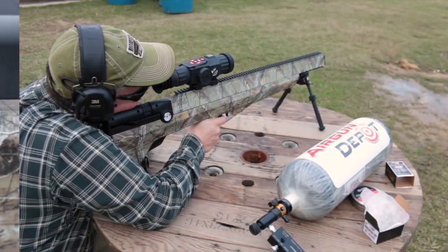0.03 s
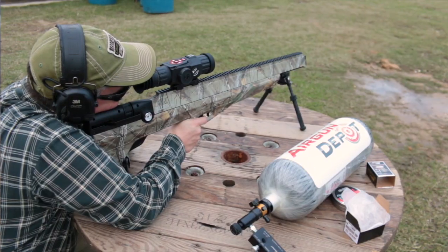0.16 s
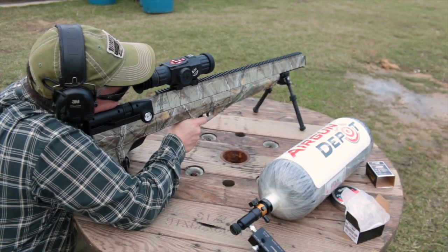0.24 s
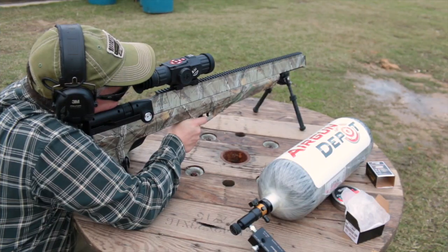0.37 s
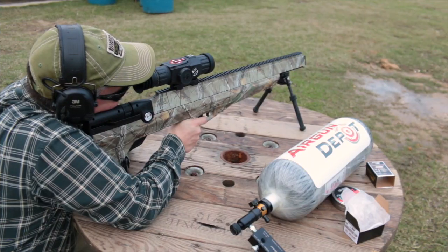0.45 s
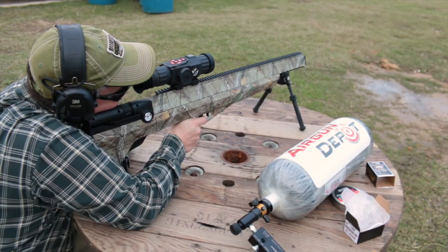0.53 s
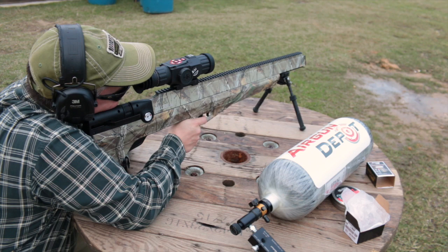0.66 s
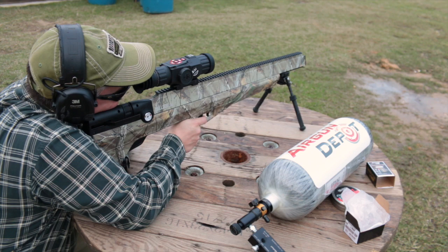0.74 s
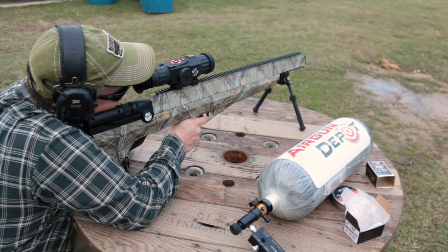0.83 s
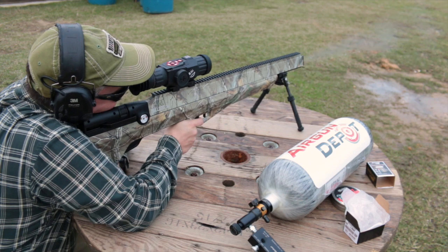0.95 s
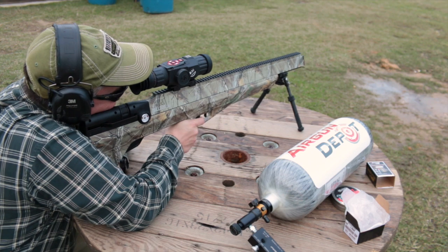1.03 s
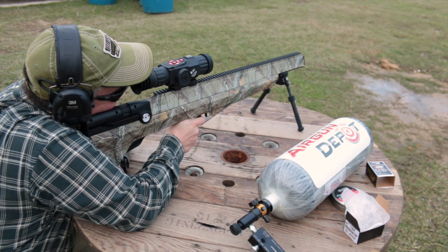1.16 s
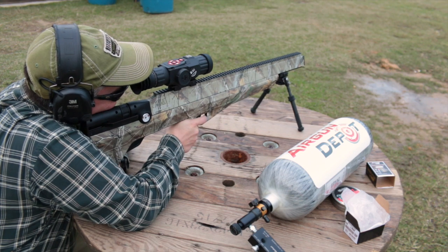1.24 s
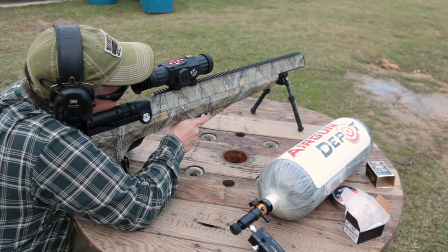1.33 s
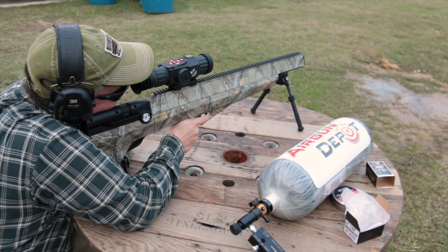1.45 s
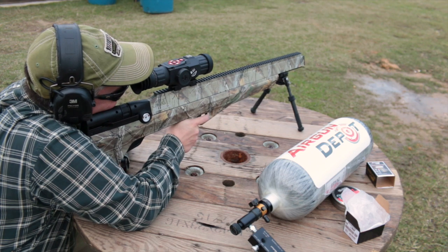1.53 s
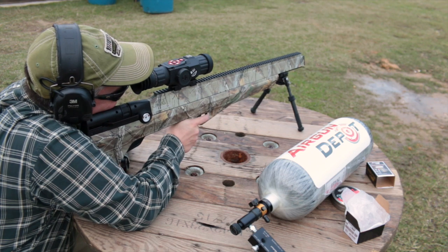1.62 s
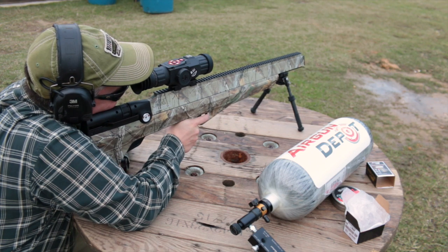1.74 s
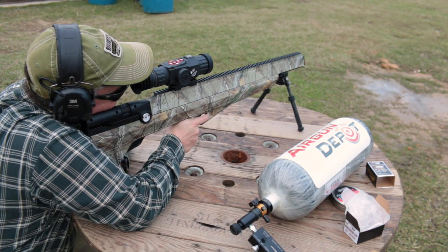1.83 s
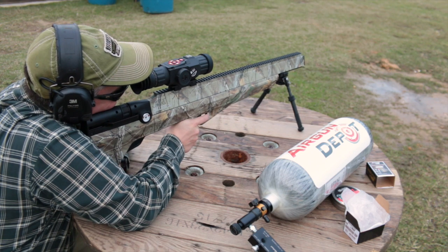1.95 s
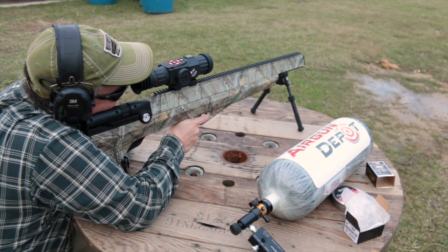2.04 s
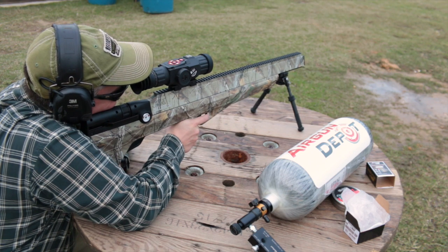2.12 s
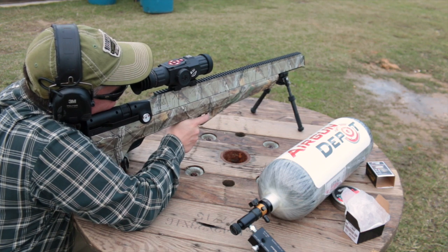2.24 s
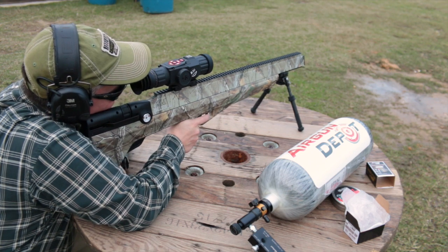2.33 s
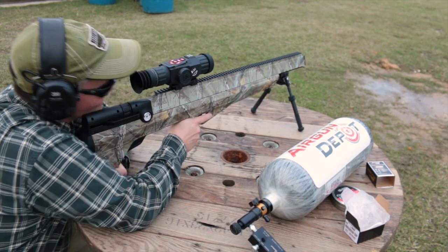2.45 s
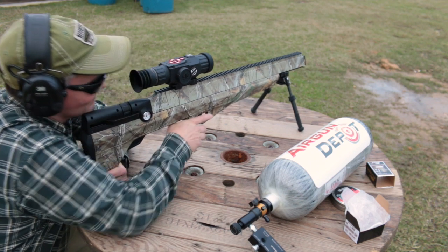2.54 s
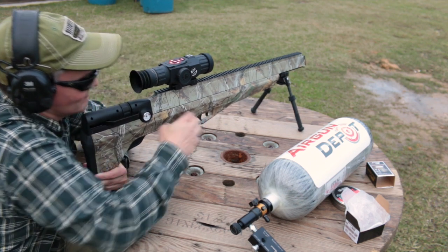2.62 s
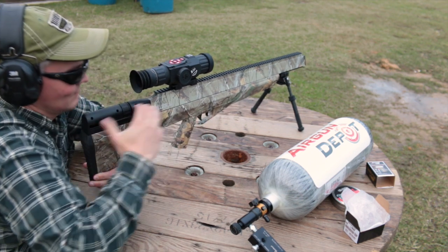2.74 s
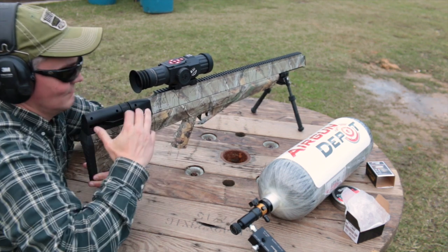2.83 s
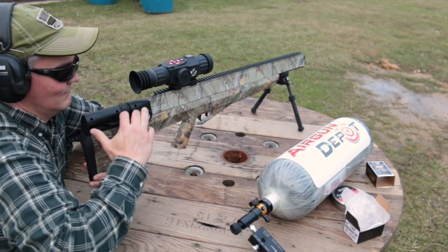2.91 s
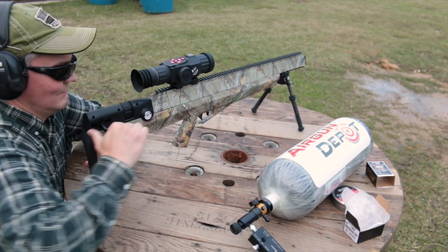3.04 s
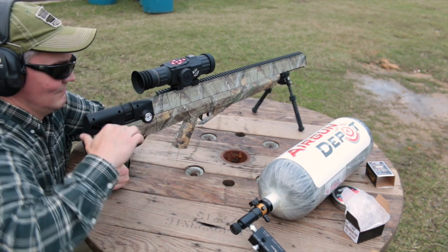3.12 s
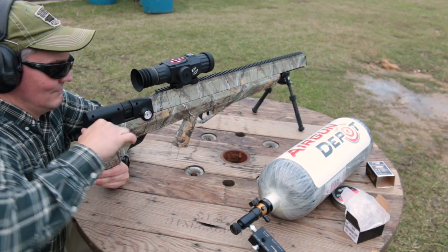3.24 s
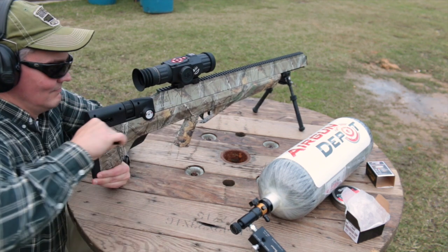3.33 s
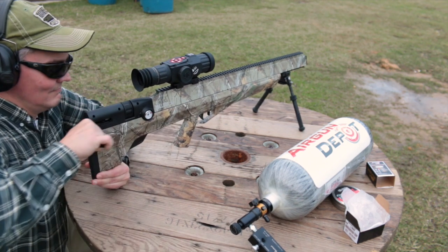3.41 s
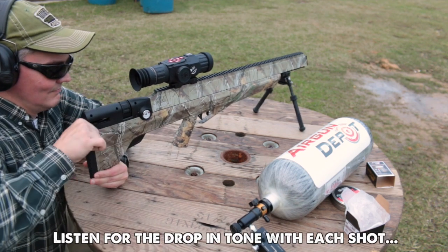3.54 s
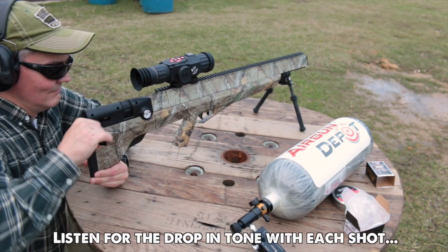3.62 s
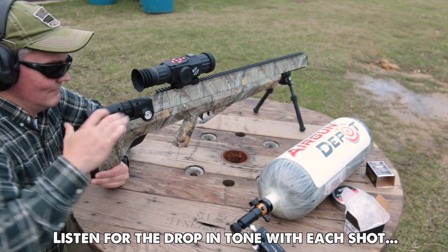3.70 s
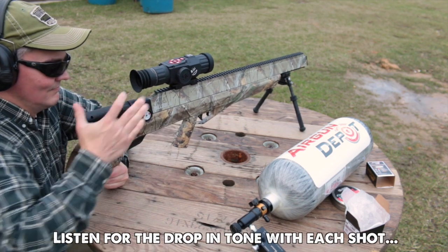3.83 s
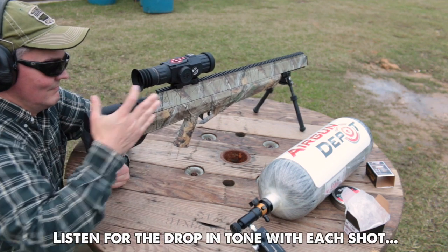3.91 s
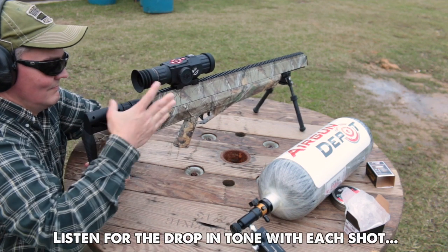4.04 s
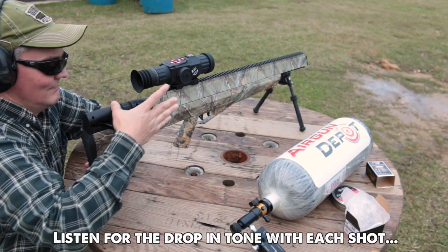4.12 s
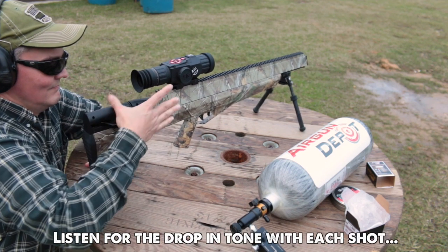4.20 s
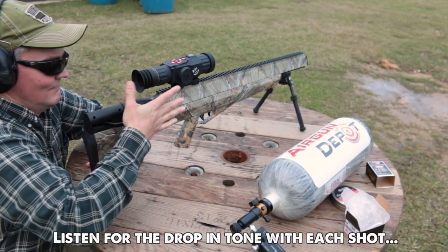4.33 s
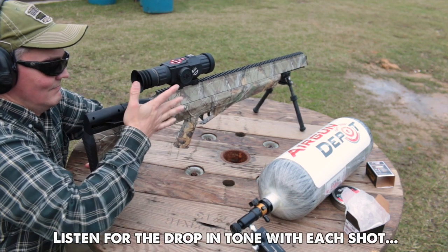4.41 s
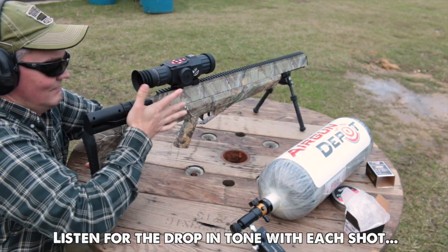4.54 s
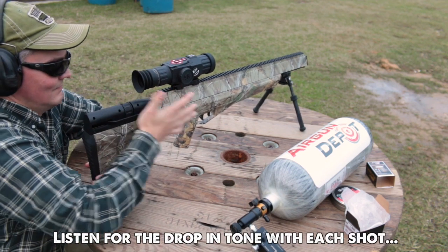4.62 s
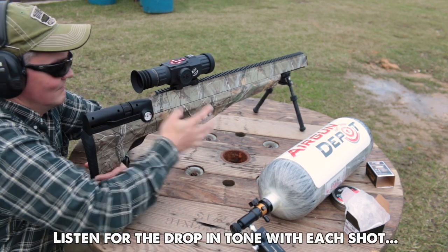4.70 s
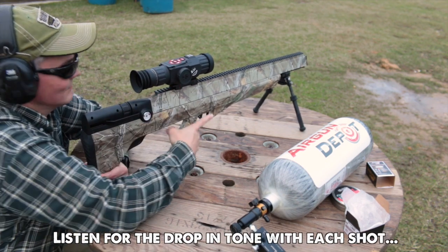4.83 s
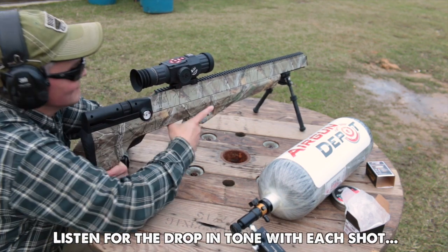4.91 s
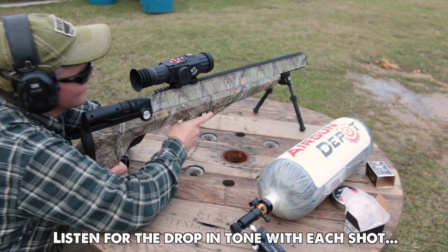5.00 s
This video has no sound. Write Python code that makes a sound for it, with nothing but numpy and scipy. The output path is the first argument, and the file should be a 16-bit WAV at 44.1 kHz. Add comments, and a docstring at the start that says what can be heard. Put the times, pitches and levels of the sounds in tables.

```python
"""An air rifle fires close to a microphone at an outdoor range: the blast overloads the input, the air left
in the reservoir rings on as a pipe tone, and the field throws the report back. A thin whistle follows.
Then hands and sleeves shift, and the metal lever is worked with slides and clicks and snaps shut.
Dull knocks on a wooden table, a quiet outdoor wash and a distant drone lie underneath."""
import sys
import numpy as np
from scipy import signal
from scipy.io import wavfile
from scipy.ndimage import uniform_filter1d

SR = 44100
rng = np.random.default_rng(int(sys.argv[2]) if len(sys.argv) > 2 else 0)


def dump(signal):
    """Clip the signal to [-1, 1] and save it as 16-bit WAV at the path in sys.argv[1]."""
    limited = np.clip(np.atleast_2d(signal).T, -1, 1)
    pcm = np.round(limited * 32767).astype(np.int16)
    wavfile.write(sys.argv[1], SR, pcm)


N = 223321


def amp(db):
    """Gain of a level in dB."""
    return 10 ** (np.asarray(db) / 20)


def unit_rms(x):
    """Scaled to rms 1."""
    return x / np.sqrt(np.mean(x ** 2) + 1e-20)


def unit_burst(x):
    """Scaled so the loudest 3 ms have rms 1."""
    return x / np.sqrt(uniform_filter1d(x ** 2, size=130).max())


def add(mix, start_s, sound):
    """Mixes a sound in at start_s."""
    part = mix[round(start_s * SR):][:len(sound)]
    part += sound[:len(part)]


def curves(rows):
    """Start time and the other columns of a table, interpolated per sample."""
    times, *columns = np.transpose(rows)
    t = np.arange(times[0], times[-1], 1 / SR)
    return times[0], [np.interp(t, times, column) for column in columns]


def resonance(x, hz, width_hz):
    """One resonator applied twice, scaled to rms 1."""
    radius = np.exp(-np.pi * width_hz / SR)
    pole = radius * np.exp(2j * np.pi * hz / SR)
    for _ in range(2):
        x = 2 * signal.lfilter([1 - radius], [1, -pole], x).real
    return unit_rms(x)


def noise(n, spectrum, patchy_db, size=512):
    """Patchy shaped noise, rms 1 before any decay; an optional t60_s column decays each band."""
    hop = size // 4
    frames, bin_hz = n // hop + 5, np.fft.rfftfreq(size, 1 / SR)
    hz, db, *t60_s = np.transpose(spectrum)

    def per_bin(values, **ends):
        return np.interp(np.log(bin_hz + 1), np.log(hz + 1), values, **ends)[:, None]

    real, imag, patches = rng.standard_normal((frames, len(bin_hz), 3)).T
    patches = unit_rms(uniform_filter1d(uniform_filter1d(patches, size=7, axis=0), size=9, axis=1))
    spectra = (real + 1j * imag) * amp(per_bin(db, left=-62, right=-58) + patchy_db * patches)
    rms = np.sqrt(np.mean(signal.istft(spectra, nperseg=size, noverlap=size - hop)[1] ** 2))
    if t60_s:
        spectra = spectra * amp(-60 * np.arange(frames) * hop / SR / per_bin(t60_s[0]))
    return signal.istft(spectra, nperseg=size, noverlap=size - hop)[1][:n] / rms


# Outdoor wash and microphone hiss: freq_hz, gain_db
AIR_SPECTRUM = [(20, -22), (45, -10), (85, -15.5), (140, -11.5), (220, -18.5), (400, -11), (560, -24),
                (900, -23.5), (1760, -33), (6700, -35.5), (16000, -36)]


def outdoor_air(wash_db=-64, drone_db=-64.5, drone_hz=117, wander_hz=5):
    """Quiet wash and hiss, with a distant drone wandering in pitch and level."""
    drift, swell = (unit_rms(uniform_filter1d(uniform_filter1d(white, size=1500), size=1500))
                    for white in rng.standard_normal((2, N)))
    phase = 2 * np.pi * np.cumsum(drone_hz + wander_hz * drift) / SR
    drone = amp(drone_db + 1.6 * swell) * np.sqrt(2) * np.sin(phase)
    return amp(wash_db) * noise(N, AIR_SPECTRUM, patchy_db=1.3, size=2048) + drone


# Knocks on the wooden table: start_s, level_db, pitch_hz, t60_s
TABLE_KNOCKS = [(0.028, -47, 258, 0.023), (0.291, -54, 152, 0.042), (0.684, -36, 160, 0.024),
                (0.819, -50.5, 151, 0.064), (2.256, -45, 450, 0.043), (3.244, -44, 170, 0.066),
                (3.527, -41.5, 295, 0.039), (3.57, -50, 431, 0.034), (4.34, -51.5, 150.3, 0.11),
                (4.506, -31, 200, .03)]


def table_knock(start_s, level_db, pitch_hz, t60_s):
    """A sharp tap swings two table modes for a few cycles."""
    t = np.arange(5000) / SR
    tap = -2.5 * t / 0.0002 * np.exp(-t / 0.00028)
    low_mode = np.sin(2 * np.pi * pitch_hz * t) * amp(-60 * t / t60_s)
    high_mode = 0.51 * np.sin(2 * np.pi * 2.05 * pitch_hz * t) * amp(-60 * t / (0.47 * t60_s))
    return start_s + 0.00301, amp(level_db) * (tap + 2 * (low_mode + high_mode))


HAMMER_S, OPEN_S, CUT_S = .9635, .9712, 1.0225  # hammer release, valve opening, abrupt drop in level


def blast_envelope(hammer_db, turn_after_s, open_db, turn_db, cut_db, after_db, fall_db_per_s):
    """Gain of one part of the discharge: hammer flight, open valve, a step at CUT_S, a 70 ms fall."""
    t = np.arange(HAMMER_S, CUT_S + .07, 1 / SR)
    times = [HAMMER_S, HAMMER_S + .002, OPEN_S - .0015, OPEN_S, OPEN_S + turn_after_s,
             CUT_S - .001, CUT_S + .001]
    levels_db = [hammer_db - 36, hammer_db - 3, hammer_db + 4, open_db, turn_db, cut_db, after_db]
    return amp(np.interp(t, times, levels_db) - fall_db_per_s * np.maximum(t - times[-1], 0))


# Air jet and muzzle boom: freq_hz, gain_db
JET_SPECTRUM = [(1500, -16), (4000, -5.5), (7000, -0.5), (9000, 2), (11500, -4), (16000, -10)]
BOOM_SPECTRUM = [(30, -4.5), (55, -4), (110, -13), (170, -2), (300, -2.5), (450, 2.5), (650, -6),
                 (1000, -9), (2200, -11), (4000, -18)]
# Barrel resonances: freq_hz, width_hz, gain_db
BARREL_MODES = [(1016, 70, -5.5), (1188, 100, -5.5), (1353, 120, 2.5), (1506, 91, -7.5), (2306, 200, -7)]
# Discharge envelopes: hammer_db, turn_after_s, open_db, turn_db, cut_db, after_db, fall_db_per_s
JET_ENVELOPE = (-15, .016, -8.5, 4, -20, -19, 500)
BOOM_ENVELOPE = (-23.5, 0.03, -1, 1.5, -11.5, -12, 350)
BARREL_ENVELOPE = (-28, .016, 4, -5, 1, -17, 250)
HIGH_RING_ENVELOPE = (-26, .018, -6.5, -15, -2, -21, 150)


def blast():
    """Escaping air hisses, the muzzle booms and the barrel rings roughly."""
    jet_gain = blast_envelope(*JET_ENVELOPE)
    n = len(jet_gain)
    rush = rng.standard_normal(n)
    jet = jet_gain * noise(n, JET_SPECTRUM, patchy_db=3)
    boom = blast_envelope(*BOOM_ENVELOPE) * noise(n, BOOM_SPECTRUM, patchy_db=0, size=2048)
    modes = sum(amp(db) * resonance(rush, hz, width) for hz, width, db in BARREL_MODES)
    barrel = blast_envelope(*BARREL_ENVELOPE) * unit_rms(modes)
    high_ring = blast_envelope(*HIGH_RING_ENVELOPE) * resonance(rush, hz=2850, width_hz=300)
    return HAMMER_S, jet + boom + barrel + high_ring


# Near and far reflections from the field: freq_hz, gain_db, t60_s
NEAR_BANDS = [(59.94, -8, 0.45), (170, -10.5, 0.9), (450, -6, 1), (896, -5.5, 0.43), (1500, -6.5, 0.93),
              (2800, -11, 1), (5000, -17.5, 0.8), (8000, -11, 0.47), (12006, -18.5, 0.55),
              (16000, -20.5, .3)]
FAR_BANDS = [(300, -32, 1.1), (900, -10, 4.2), (1500, 2.5, 2.8), (2500, -7.5, 2.3), (4400, -17, 1.8),
             (8000, -19, 2.1), (12860, -30, 0.89)]


def field_reverb(start_s=1.025, length_s=1.6, near_db=-21, far_db=-44.5):
    """The report returns as a near, quick wash and a far, dull, slow one."""
    n = round(length_s * SR)
    near = amp(near_db) * noise(n, NEAR_BANDS, patchy_db=2.4)
    far = amp(far_db) * noise(n, FAR_BANDS, patchy_db=2.5)
    return start_s, (near + far) * np.minimum(np.arange(n) / 400, 1)


# Reservoir overtones, relative to the lowest mode: freq_hz, gain_db, extra_loss_t60_s, partner_ratio
RESERVOIR_MODES = [(691, -15, 1.8, 0.84), (1031, -13, 1.7, .45), (1380, -19, 4.3, .2), (1723, -24, 1, .2),
                   (1952, -28, 1.5, .2), (2748, -14.5, 2, .15), (3354, -25, 0.9, .2),
                   (4460, -24.5, 1.7, .1), (5150, -26, 1.2, .2), (5440, -28, 1.1, .2)]


def reservoir(start_s=1.03, pitch_hz=342.8, level_db=-17, even_s=.12, fall_db_per_s=46.5, beat_hz=13):
    """A pipe tone rings; its level stays even briefly, then fades. Beating overtones die faster."""
    t = np.arange(0, 1.3, 1 / SR)
    tone = np.sin(2 * np.pi * pitch_hz * t)
    for hz, gain_db, t60_s, partner_ratio in RESERVOIR_MODES:
        phase = 2 * np.pi * rng.random()
        mode = np.sin(2 * np.pi * hz * t + phase)
        partner = partner_ratio * np.sin(2 * np.pi * (hz - beat_hz) * t + phase)
        turbulence_db = 2.6 * unit_rms(uniform_filter1d(rng.standard_normal(len(t)), size=900))
        tone += amp(gain_db + turbulence_db - 60 * t / t60_s) * (mode + partner)
    envelope = amp(level_db - fall_db_per_s * np.maximum(t - even_s, 0))
    fades = np.minimum(t / .012, 1) * np.minimum((t[-1] - t) / .02, 1)
    return start_s, np.sqrt(2) * envelope * tone * fades


# Echoes off distant surfaces: peak_s, level_db, centre_hz, length_s
DISTANT_ECHOES = [(1.072, -20, 1600, .008), (1.08, -25, 2020, 0.013), (1.088, -24.5, 3020, 0.0099),
                  (1.117, -27, 1500, .01), (1.165, -31, 2200, .06), (1.218, -27, 194, .013),
                  (1.222, -30, 2900, .015), (1.228, -31, 1090, .025), (1.275, -37, 1560, .04),
                  (1.303, -32.5, 185, .01), (1.35, -40.5, 1500, 0.055)]


def echo(peak_s, level_db, centre_hz, length_s):
    """One surface returns the report as a smeared burst of band noise."""
    t = np.arange(4000) / SR
    rise_s = length_s / 3
    smear = t / rise_s * np.exp(1 - t / rise_s)
    band = resonance(rng.standard_normal(len(t)), centre_hz, width_hz=.5 * centre_hz)
    return peak_s - rise_s, amp(level_db) * band * smear


# Thin high whistle: time_s, pitch_hz, level_db
WHISTLE_PATH = [(1.63, 9800, -86), (1.69, 11500, -78), (1.72, 12170, -61), (1.77, 13350, -69),
                (1.825, 13750, -73), (1.862, 12600, -62), (1.89, 12400, -79), (1.935, 11800, -76),
                (1.97, 12400, -78), (2.05, 12300, -84)]


def whistle(partner_ratio=1.07, partner_db=-80):
    """A thin, high, wavering whistle with a faint partner, perhaps a ricochet, bird or insect."""
    start_s, (pitch_hz, level_db) = curves(WHISTLE_PATH)
    phase = 2 * np.pi * np.cumsum(uniform_filter1d(pitch_hz, size=1500)) / SR
    partner = amp(partner_db) * np.sin(partner_ratio * phase) * np.hanning(len(phase))
    return start_s, np.sqrt(2) * amp(level_db) * np.sin(phase) + partner


# Weight shifting at the table: time_s, rumble_db
WEIGHT_SHIFTS = [(2.2, -72.5), (2.32, -55.5), (2.55, -51.5), (2.91, -60.5), (3.22, -50), (3.34, -57.5),
                 (3.47, -46), (3.7, -58.5), (4.04, -58.5), (4.2, -69), (4.45, -66.5), (4.52, -58),
                 (5.06, -58)]
# Table rumble and clothes rustle: freq_hz, gain_db
RUMBLE_SPECTRUM = [(25, -32), (60, 3.5), (150, 5.5), (350, -5), (600, -12)]
RUSTLE_SPECTRUM = [(500, 4.5), (1200, -0.5), (3000, -13), (7000, -12.5), (16000, -20)]


def body_shift():
    """Shifting weight rumbles through the table; the rustle of clothes follows it in part."""
    start_s, (rumble_db,) = curves(WEIGHT_SHIFTS)
    n = len(rumble_db)
    rumble = amp(rumble_db) * noise(n, RUMBLE_SPECTRUM, patchy_db=2.5, size=1024)
    rustle = amp(-35 + .51 * rumble_db) * noise(n, RUSTLE_SPECTRUM, patchy_db=2.5)
    return start_s, (rumble + rustle) * np.minimum(np.arange(n) / 2000, 1)


# Strokes of hands, sleeves and sliding bolt: start_s, peak_s, end_s, rub_db, cloth_db, scrape_db
FRICTION_STROKES = [(2.25, 2.27, 2.34, -60.5, -80, -80), (2.35, 2.378, 2.54, -58, -68, -68),
                    (2.45, 2.56, 2.58, -64, -61, -58), (2.61, 2.665, 2.7, -67, -71, -69),
                    (2.858, 2.87, 2.905, -52.5, -51.5, -48.5), (2.93, 2.99, 3.1, -56, -64, -65),
                    (3.035, 3.05, 3.13, -53.5, -53.5, -63), (3.06, 3.095, 3.14, -49, -64, -53),
                    (3.15, 3.17, 3.1, -61, -73, -71), (3.225, 3.27, 3.62, -50, -69, -61),
                    (3.428, 3.44, 3.49, -35.5, -52, -52), (3.58, 3.61, 3.65, -61, -76, -79),
                    (3.67, 3.685, 3.75, -50, -70, -73), (3.79, 3.802, 3.885, -49, -59, -44.5),
                    (3.8, 3.848, 3.86, -46, -54, -62), (3.86, 3.872, 3.9, -54, -54, -62),
                    (3.88, 3.902, 3.95, -50.5, -57, -65), (3.94, 3.968, 3.993, -48, -51, -55.5),
                    (4.2, 4.255, 4.2, -68, -65.5, -66), (4.515, 4.53, 4.57, -45.5, -64, -62),
                    (4.54, 4.564, 4.58, -54, -56, -63), (4.8, 5.0, 5.2, -71, -76, -72)]
# Resonances under the rubbing: freq_hz, width_hz, gain_db
SLIDE_MODES = [(1404, 120, 1), (1995, 88, -6.5), (2500, 100, -2.5), (2835, 130, -3), (3390, 300, -7)]
# Rub, cloth fizz and slide scrape: freq_hz, gain_db
RUB_SPECTRUM = [(500, -1), (900, 0), (1400, 5), (2500, -9), (3800, -11), (4600, -12)]
CLOTH_SPECTRUM = [(3500, 3.5), (4300, -2.5), (5300, -2.5), (7200, -4.5), (8500, -8)]
SCRAPE_SPECTRUM = [(7500, -31), (9000, 12.5), (10500, 11), (13500, 10), (16000, 1)]


def friction_stroke(start_s, peak_s, end_s, rub_db, cloth_db, scrape_db):
    """Pressure swells and eases; a jumpy grip modulates the singing rub, the cloth and the scrape."""
    t = np.arange(start_s, end_s, 1 / SR)
    n = len(t)
    pressure = amp(-24.5 * np.interp(t, [start_s, peak_s, end_s], [1, 0, 1]) ** 1.44)
    grip_db = 2.25 * unit_rms(uniform_filter1d(rng.standard_normal(n), size=150))
    slip = rng.standard_normal(n)
    modes = sum(amp(db) * resonance(slip, hz, width) for hz, width, db in SLIDE_MODES)
    rub = amp(rub_db) * unit_rms(noise(n, RUB_SPECTRUM, patchy_db=2.5) + .7 * unit_rms(modes))
    cloth = amp(cloth_db) * noise(n, CLOTH_SPECTRUM, patchy_db=.87)
    scrape = amp(scrape_db) * noise(n, SCRAPE_SPECTRUM, patchy_db=3.2)
    fades = np.minimum(np.minimum(np.arange(n), np.arange(n)[::-1]) / 130, 1)
    return start_s, (rub + cloth + scrape) * unit_rms(amp(grip_db)) * pressure * fades


# Lever and bolt clicks: start_s, ring_db, body_rel_db, tick_rel_db, pitch_hz, rise_s
LEVER_CLICKS = [(2.374, -59, 4, 4.5, 965, .0012), (2.658, -54.5, 8, -6, 1040, .0028),
                (2.722, -66, -1, 10, 6000, .0018), (2.908, -51.5, 3, -2, 1080, .0024),
                (2.972, -58, 15, -8, 600, 0.0015), (3.001, -43, 2.5, -12, 1120, 0.0011),
                (3.072, -55, -13, -2, 1570, .0015), (3.105, -25, -5.5, -11.5, 1300, 0.00091),
                (3.141, -35.5, -7.5, -1, 4900, .0008), (3.199, -28, -3, -20, 1150, 0.0013),
                (3.244, -48.5, 2, -20, 1300, .0018), (3.433, -38.5, -19, -13, 1830, 0.00072),
                (3.456, -23, -7.5, 6, 4930, 0.00092), (3.476, -35, 0, 4, 3300, .0025),
                (3.487, -13, -8, -8, 2140, 0.0025), (3.499, -36.5, 5.5, -2, 1400, 0.00072),
                (3.615, -41, 1, -1, 1220, 0.0023), (3.658, -42, 4, 2, 912, 0.0011),
                (3.667, -25, -4, -7, 1640, 0.002), (3.709, -51, 9.5, -17, 1600, .0013),
                (3.733, -49, 11.5, -12, 480, 0.003), (3.761, -45.5, 8, -11, 480, .0015),
                (3.773, -42, -20, -14.5, 1452, 0.0016), (3.869, -41, -7.5, -15, 970, .0029),
                (3.905, -32.5, -8, -6.5, 1500, 0.0041), (4.5065, -16.5, -6, 2.5, 2800, .0036)]
# Metal lever resonances: freq_hz, width_hz, gain_db
LEVER_MODES = [(290, 310, -3), (452, 190, 4.5), (743, 93, -3.5), (1300, 260, 4.5), (1746, 250, 6.5),
               (1994, 450, 7.5), (2456, 470, 11.5), (3074, 520, 12), (3500, 480, 6), (4990, 720, 13.5),
               (6680, 450, 6.5), (8110, 600, 8.5), (10100, 2400, 6), (11500, 500, 0), (13700, 1600, 15)]


def lever_click(start_s, ring_db, body_rel_db, tick_rel_db, pitch_hz, rise_s, t60_s=.023):
    """A rattling contact drives the lever's modes, most near pitch_hz; the stock jolts the table."""
    t = np.arange(5000) / SR
    blow = rng.standard_normal(len(t)) * np.minimum(t / rise_s, 1) ** 2
    rattle = blow * (amp(-60 * t / t60_s) + .044 * amp(-60 * t / .087))
    snap = blow * (amp(-60 * t / (.83 * t60_s)) + .0092 * amp(-60 * t / .11))
    push = t / .0031
    jolt = 2.5 * push * (2 - push) * np.exp(-push)
    sound = amp(-23 + .65 * ring_db) * jolt  # grows less than the blow
    ring_top_hz = np.clip(2.2 * pitch_hz, 1800, 4500)  # a dull blow excites less treble
    for low_hz, high_hz, noise_top_hz, band_db, drive in ((200, 900, 900, body_rel_db, rattle),
                                                          (900, 4500, ring_top_hz, 0, rattle),
                                                          (4500, 16500, 13000, tick_rel_db, snap)):
        bandpass = signal.butter(3, [low_hz, noise_top_hz], "band", fs=SR, output="sos")
        broad = signal.sosfilt(bandpass, drive)
        modes = 0
        for hz, width_hz, gain_db in LEVER_MODES:
            if low_hz < hz < high_hz:
                off_pitch_db = 20 * min(abs(np.log2(hz / pitch_hz)), .8)
                tilt_db = 1.6 * np.log2(hz / low_hz)
                modes += amp(gain_db - off_pitch_db - tilt_db) * resonance(drive, hz, width_hz)
        sound += amp(ring_db + band_db) * unit_burst(unit_rms(modes) + .75 * unit_rms(broad))
    return start_s + .0004, sound


def scene():
    """All sources at one microphone."""
    mix = outdoor_air()
    for part in (blast(), reservoir(), field_reverb(), whistle(), body_shift()):
        add(mix, *part)
    for table, play in ((DISTANT_ECHOES, echo), (LEVER_CLICKS, lever_click),
                        (TABLE_KNOCKS, table_knock), (FRICTION_STROKES, friction_stroke)):
        for row in table:
            add(mix, *play(*row))
    return mix[None]


def record(dry):
    """The input clips on the blast; a 16 kHz low-pass and a second clip follow."""
    overloaded = np.clip(dry, -1, 1)
    lowpass = signal.firwin(255, 16000, window=("kaiser", 9), fs=SR)
    return np.clip(signal.oaconvolve(overloaded, lowpass[None], "same"), -1, 1)


dry = scene()
out = record(dry)
dump(out)
```